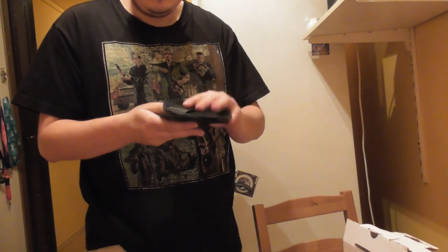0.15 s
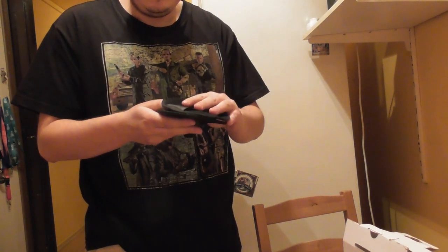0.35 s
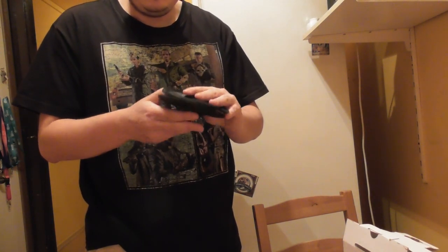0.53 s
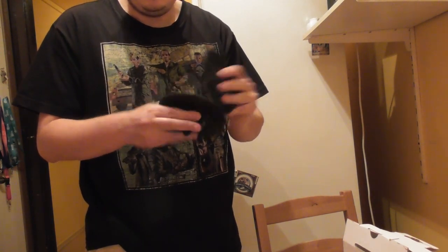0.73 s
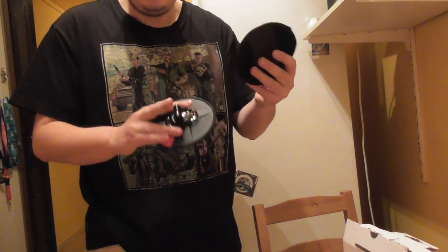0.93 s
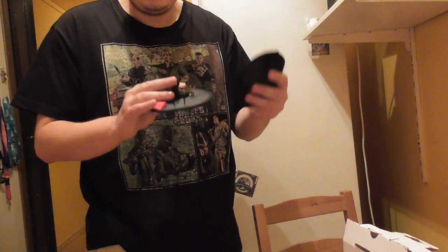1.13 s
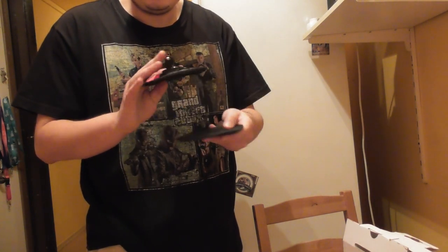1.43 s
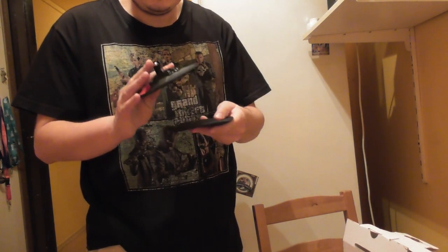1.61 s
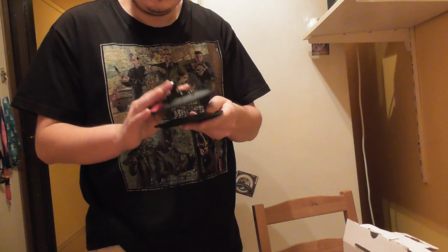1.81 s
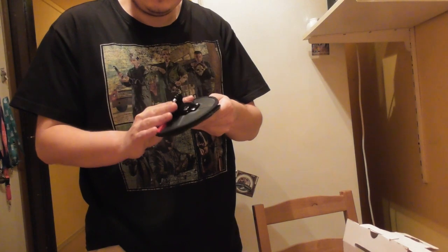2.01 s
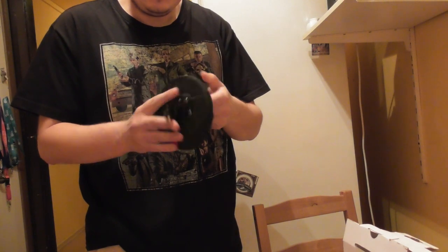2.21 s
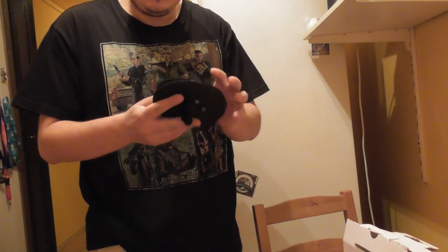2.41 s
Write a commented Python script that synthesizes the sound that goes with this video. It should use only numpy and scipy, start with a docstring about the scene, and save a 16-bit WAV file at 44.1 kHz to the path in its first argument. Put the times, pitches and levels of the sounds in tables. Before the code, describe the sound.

Loud sharp snap of magnetic discs, light finger ticks and edge knocks, then a second softer snap

```python
"""Two rubber-coated magnetic discs snap together face to face, twice, in a small, bare room.
A snap is a noise crack, a choked ring, a push of squeezed-out air and steel fittings singing on.
Between the snaps, edges knock on a free disc: short damped modes plus noise.
Fingers rub and tick on the coating: shaped noise with sparse slips.
The walls answer with decaying diffuse noise, over soft air noise and a faint hum."""
import sys
import numpy as np
from scipy import signal
from scipy.fft import rfft, irfft, next_fast_len
from scipy.io import wavfile
from scipy.ndimage import map_coordinates

SR = 44100
rng = np.random.default_rng(int(sys.argv[2]) if len(sys.argv) > 2 else 0)


def generate_wav(sig):
    """Save sig (samples, or channels by samples) to the path in sys.argv[1] as 16-bit PCM at SR."""
    pcm = np.round(np.clip(np.atleast_2d(sig).T, -1, 1) * 32767).astype(np.int16)
    wavfile.write(sys.argv[1], SR, pcm)


N = 112454

# face-to-face snaps: t/s, level/dB, choked-ring pitch factor, air push/dB, push width/s,
# crack length/s, room/dB, steel/dB, choked-ring tilt/(dB/octave)
SNAPS = [(0.2104, -8, 1, -5, 0.0023, 0.0024, -16, -26, -0.5),
         (2.2204, -14, 0.95, -26, 0.00073, 0.0015, -12.5, -54, 1.5)]
# modes of the closed pair: f/Hz, level/dB, t60/s
PAIR_MODES = [(483, 11.5, 0.0098), (880, -2.5, 0.016), (1352, 4, 0.0099), (2300, 1, 0.012),
              (3780, -4, 0.02)]
# steel fittings, low lines clear, high ones buzzing: f/Hz, level/dB, t60/s, phase wobble rate/Hz
STEEL_LINES = [(1026, 1, 0.66, 120), (1156, -1.5, 0.77, 55), (1298, -0.5, .3, 90), (3720, -9, 0.64, 500),
               (4090, -6, 0.84, 400)]
# noise of a face-to-face contact: f/Hz, density/(dB per Hz)
SNAP_CRACK_COLOUR = [(1800, -4), (3600, 0), (4900, -14.5), (8300, 0.5), (10500, 0), (12600, -13),
                     (14000, -9.5), (16000, -4.5)]
SNAP_CRACK_DB, SNAP_ATTACK_S, PUSH_DELAY_S = -3, 0.00068, 0.0027

# edge on a free disc: t/s, level/dB, crack/dB, tilt/(dB/octave), room/dB
KNOCKS = [(0.7071, -32.5, -3, 4.5, -2), (0.758, -50, -19, -4, 12), (0.772, -40, -19, -0.5, 3.5),
          (1.5258, -63, 14, 5, 15), (1.9196, -15.5, -3.5, 1, 3), (1.99, -23, -3, 2, 2.5),
          (1.9922, -27, -0.5, 1.5, 3), (2.217, -26, -2, 0.5, -15)]
# modes of a free disc held in the hand: f/Hz, level/dB, t60/s
DISC_MODES = [(325, -4.5, 0.044), (461, -4.5, 0.0304), (594, 1, 0.029), (906, 8.5, 0.012),
              (963.5, -12, 0.13), (1330, -2.5, 0.022), (1814, -6, 0.036), (2352, -7, 0.024),
              (3260, -9.5, 0.029)]
# noise of an edge blow: f/Hz, density/(dB per Hz)
EDGE_CRACK_COLOUR = [(200, -36), (1200, 2.5), (3900, 1), (4900, -9), (8300, -5), (12000, -20), (16000, -29)]
KNOCK_CRACK_T60_S, KNOCK_ATTACK_S = 0.017, 0.00053
KNOCK_LOW_HZ = 202  # a free disc radiates little bass
KNOCK_WASH_DB, KNOCK_WASH_TILT_DB_PER_OCT, KNOCK_RING_ROOM_DB = -14.5, -3.5, -46

# skin catching on the coating: t/s, peak before room/dB
TICKS = [(0.0878, -41), (0.6391, -29), (0.7298, -35), (0.7727, -24), (0.8003, -28.5), (0.8052, -23.5),
         (0.8885, -30), (0.9524, -37), (1.0015, -34), (1.0197, -37), (1.1402, -42.5), (1.154, -39),
         (1.4706, -41.5), (1.7645, -35)]
# noise of a tick: f/Hz, density/(dB per Hz)
TICK_COLOUR = [(200, -7.5), (2000, -19), (4800, -15), (8000, 2.5), (11000, -4.5), (15500, -9.5)]
TICK_T60_S, TICK_ROOM_DB = 0.0065, -27
# finger rub envelope before flutter: t/s, level/dB
RUB_LEVEL = [(0, -60.5), (.1, -61), (.17, -73), (.5, -70), (.56, -59.5), (.66, -51), (.73, -42),
             (.755, -48.5), (0.805, -42.5), (.84, -56), (.93, -60), (1.03, -58.5), (1.15, -65),
             (1.19, -72.5), (1.27, -69), (1.3, -58), (1.345, -66), (1.4, -64.5), (1.45, -67), (1.718, -94),
             (1.87, -71), (2.1, -66), (2.201, -48.5), (2.26, -62), (2.491, -76), (2.55, -47.5)]
# noise of the rub: f/Hz, density/(dB per Hz)
RUB_COLOUR = [(150, -34), (900, 4), (1700, -4), (3600, -2), (5000, -6.5), (7800, 1), (11500, -6.5),
              (15500, -15.5)]
RUB_ROUGH_DB, RUB_GRAINS_PER_S, RUB_FLUTTER_DB, RUB_ROOM_DB = 2, 240, 1.7, -10
SLIPS_PER_S, SLIP_DB, SLIP_TILT_DB_PER_OCT = 400, -5, -2.0  # tiny stick-slips over the smooth rub

# what a blow spreads into the room: f/Hz, density/(dB per Hz)
WASH_COLOUR = [(70, -37), (170, -11.5), (330, -8), (470, -1.5), (650, 3), (800, -4), (1200, -1.5),
               (1550, -7), (2050, -2), (2800, -6.5), (3500, -1), (4200, -2), (4950, -13), (6200, -7),
               (8500, -11), (11000, -26), (15000, -28.5)]
# room decay: f/Hz, t60/s
ROOM_T60 = [(100, 0.48), (300, 0.74), (700, 0.54), (1800, 0.53), (4000, 0.51), (7000, 0.45), (10000, 0.35),
            (15000, 0.22)]
ROOM_GAP_S, ROOM_BUILD_S = 0.0003, 0.0011
# stereo width of diffuse sound: f/Hz, side over mid/dB
WIDTH = [(60, 2), (300, -6), (1100, -8.5), (2200, -12), (4500, -28), (9000, -9.5), (15000, 3)]
PORT_BAND_HZ, PORT_SIDE_DB = (1040, 2600), -11  # band in which the two microphone ports differ

# background air noise: f/Hz, density/(dB per Hz)
AIR_COLOUR = [(60, -7), (170, -4.5), (290, -1), (350, -7.5), (490, -4.5), (850, -8), (1650, -22),
              (2400, -16.5), (3000, -21.5), (4200, -17.5), (5000, -30), (8000, -20), (16000, -30)]
# appliance hum lines: f/Hz, rms level before waver/dB
HUM_LINES = [(98, -74), (147, -68), (164, -72), (196, -70), (495, -71)]
AIR_DB, HUM_WAVER_DB = -60, 3.5
TOP_HZ = 16000


def snaps():
    """Magnets slam shut: crack, choked ring, air push, and steel singing on."""
    out, t = np.zeros((2, N)), np.arange(SR) / SR
    for s, db, pitch, push_db, push_s, crack_s, room_db, steel_db, tilt_db in SNAPS:
        push = amp(push_db) * np.exp(-((t - PUSH_DELAY_S) / push_s) ** 2)
        # neighbouring modes start in opposite phase
        choked = sum((-1) ** k * ring([mode], t, pitch, tilt_db) for k, mode in enumerate(PAIR_MODES))
        body = (choked - push) * (1 - np.exp(-t / SNAP_ATTACK_S))
        crack = amp(SNAP_CRACK_DB) * noise(SNAP_CRACK_COLOUR, SR) * np.exp(-(t / crack_s) ** 4)
        steel = np.zeros(SR)
        for hz, line_db, t60_s, wobble_hz in STEEL_LINES:
            phase = 2 * np.pi * hz * t + 2 * wobble(wobble_hz)[:SR]
            steel += amp(line_db) * fade(t, t60_s) * np.sin(phase)
        direct = ports(body + crack + amp(steel_db) * steel)
        add(out, s, amp(db) * (direct + amp(room_db) * room(WASH_COLOUR)))
    return out


def knocks():
    """An edge meets the other disc, which is free to ring briefly."""
    out, t = np.zeros((2, N)), np.arange(SR) / SR
    no_bass = signal.butter(2, KNOCK_LOW_HZ, "high", fs=SR)
    attack = 1 - np.exp(-t / KNOCK_ATTACK_S)
    for s, db, crack_db, tilt_db, room_db in KNOCKS:
        body = signal.lfilter(*no_bass, ring(DISC_MODES, t, tilt_db=tilt_db) * attack)
        crack = amp(crack_db) * noise(EDGE_CRACK_COLOUR, SR) * fade(t, KNOCK_CRACK_T60_S)
        wash_colour = tilted(WASH_COLOUR, KNOCK_WASH_TILT_DB_PER_OCT + tilt_db)
        wash = amp(KNOCK_WASH_DB) * room(wash_colour)
        ringing = signal.fftconvolve(body[None], room(WASH_COLOUR), axes=1)[:, :SR]
        reply = wash + amp(KNOCK_RING_ROOM_DB) * ringing
        add(out, s, amp(db) * (body + crack + amp(room_db) * reply))
    return out


def fingers():
    """Skin rubs and slips on the coating; the walls carry rubs and ticks on."""
    return rubbing() + finger_ticks()


def rubbing():
    """Grainy friction noise plus random stick-slip impulses, convolved with a room tail."""
    level_db = np.interp(np.arange(N) / SR, *np.transpose(RUB_LEVEL)) + RUB_FLUTTER_DB * wobble(70)
    grains = amp(RUB_ROUGH_DB * wobble(RUB_GRAINS_PER_S))
    rub = unit(wide_noise(RUB_COLOUR, N) * grains)
    impulses = (rng.random(N) < SLIPS_PER_S / SR) * rng.standard_normal(N)
    slips = unit(coloured(impulses, tilted(TICK_COLOUR, SLIP_TILT_DB_PER_OCT)))
    stroke = amp(level_db) * (rub + amp(SLIP_DB) * slips)
    tail = room(RUB_COLOUR)
    reply = signal.fftconvolve(stroke, tail / np.linalg.norm(tail[0]), axes=1)[:, :N]
    return stroke + amp(RUB_ROOM_DB) * reply


def finger_ticks():
    """Single sharp slips: fast-decaying noise bursts with a room tail."""
    out, t = np.zeros((2, N)), np.arange(SR) / SR
    for s, db in TICKS:
        tick = noise(TICK_COLOUR, SR) * fade(t, TICK_T60_S)
        tick /= np.abs(tick).max()
        add(out, s, amp(db) * (tick + amp(TICK_ROOM_DB) * room(TICK_COLOUR)))
    return out


def room(points):
    """The walls' answer to a click of this spectrum: a fresh diffuse tail whose treble dies first."""
    hz, s, z = signal.stft(wide_noise(points, SR), SR, nperseg=256)
    decay = fade(s, along(ROOM_T60, hz)[:, None])
    tail = signal.istft(z * decay, SR, nperseg=256)[1][:, :SR]
    since_gap_s = np.maximum(np.arange(SR) / SR - ROOM_GAP_S, 0)
    return tail * (1 - np.exp(-since_gap_s / ROOM_BUILD_S))


def room_tone():
    """Soft air noise and an appliance hum of sines wavering in level and phase."""
    t = np.arange(N) / SR
    hum = np.zeros(N)
    for hz, db in HUM_LINES:
        level = np.sqrt(2) * amp(db + HUM_WAVER_DB * wobble(9.93))
        hum += level * np.sin(2 * np.pi * hz * t + 0.73 * wobble(5.0))
    return amp(AIR_DB) * wide_noise(AIR_COLOUR, N) + hum


def ports(x):
    """A direct sound at two microphone ports: a delayed band is added to one, taken from the other."""
    late = np.pad(x, (SR // 5000, 0))[:len(x)]  # about 0.2 ms
    band = signal.butter(1, PORT_BAND_HZ, "band", fs=SR)
    side = amp(PORT_SIDE_DB) * signal.lfilter(*band, late)
    return np.array([x + side, x - side])


def wide_noise(points, n):
    """Diffuse noise as two close microphones hear it."""
    mid, side = noise(points, n), coloured(noise(points, n), WIDTH)
    return np.array([mid + side, mid - side])


def noise(points, n):
    """Coloured noise of rms 1."""
    return unit(coloured(rng.standard_normal(n), points))


def coloured(x, points):
    """A signal shaped by a (Hz, dB) spectrum."""
    n = x.shape[-1]
    return irfft(rfft(x) * amp(along(points, np.fft.rfftfreq(n, 1 / SR))), n)


def tilted(points, tilt_db):
    """A spectrum tilted about 1 kHz, in dB per octave."""
    return [(hz, db + tilt_db * np.log2(hz / 1000)) for hz, db in points]


def ring(modes, t, pitch=1, tilt_db=0):
    """Damped modes, tilted about 1 kHz in dB per octave."""
    total = np.zeros(len(t))
    for (hz, db), (_, _, t60_s) in zip(tilted([m[:2] for m in modes], tilt_db), modes):
        total += amp(db) * fade(t, t60_s) * np.sin(2 * np.pi * hz * pitch * t)
    return total


def fade(t, t60_s):
    """Exponential decay by 60 dB in t60_s."""
    return np.exp(-np.log(1000) * t / t60_s)


def wobble(rate_hz):
    """A smooth random curve, rate_hz knots a second."""
    knots = rng.standard_normal(int(N * rate_hz / SR) + 4)
    return map_coordinates(knots, [np.arange(N) * rate_hz / SR])


def along(points, hz):
    """Interpolate (Hz, value) points on a log frequency axis."""
    f, v = np.transpose(points)
    return np.interp(np.log(hz + 1), np.log(f + 1), v)


def amp(db):
    """Decibels to gain."""
    return 10 ** (np.asarray(db) / 20)


def unit(x):
    """Scale to rms 1."""
    return x / np.sqrt(np.mean(x ** 2) + 1e-20)


def add(out, s, x):
    """Mix x into out from time s on."""
    i = max(round(s * SR), 0)
    out[:, i:i + x.shape[-1]] += x[..., :N - i]


def scene():
    """Discs, fingers and the room."""
    return snaps() + knocks() + fingers() + room_tone()


def record(dry):
    """Round off the highest peaks, then remove all above the band limit."""
    held = dry / (1 + np.abs(dry / .9) ** 6) ** (1 / 6)
    m = next_fast_len(N + SR // 2)
    low_pass = np.clip((TOP_HZ - np.fft.rfftfreq(m, 1 / SR)) / 400 + .5, 0, 1)  # 400 Hz wide edge
    return irfft(rfft(held, m) * low_pass, m)[:, :N]


dry = scene()
out = record(dry)
generate_wav(out)
```